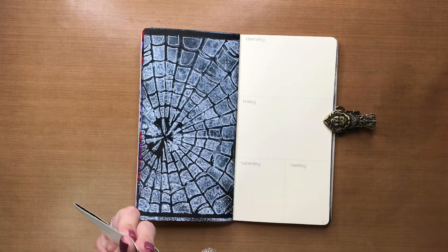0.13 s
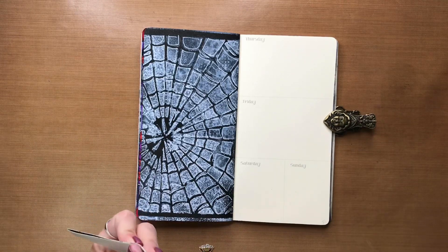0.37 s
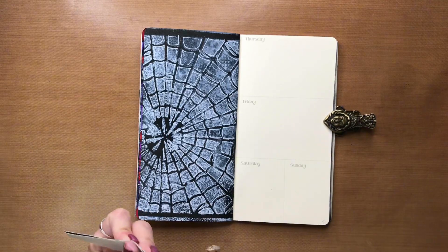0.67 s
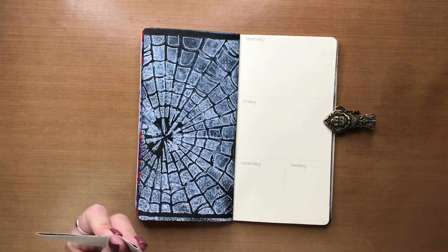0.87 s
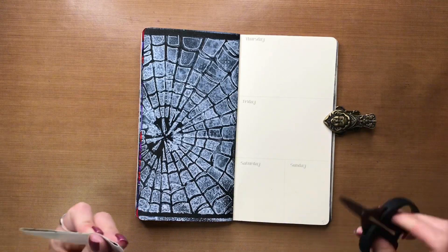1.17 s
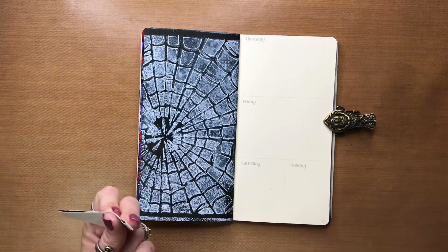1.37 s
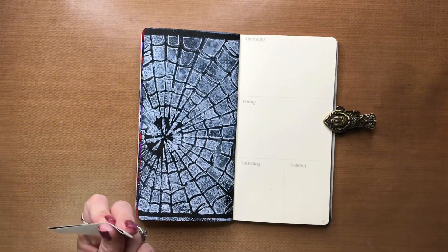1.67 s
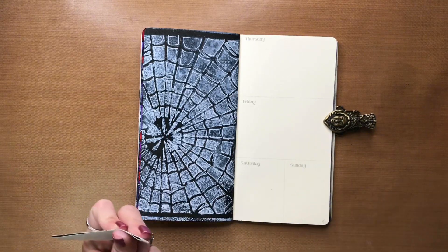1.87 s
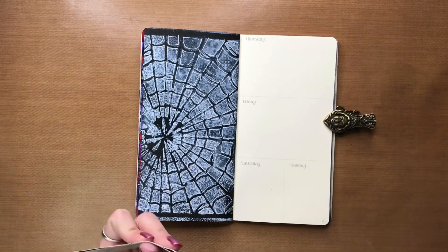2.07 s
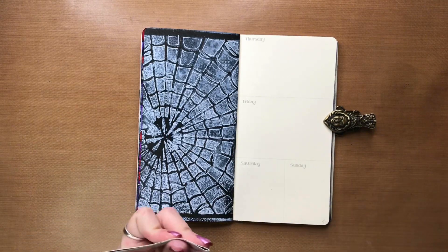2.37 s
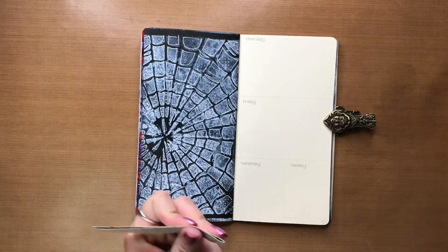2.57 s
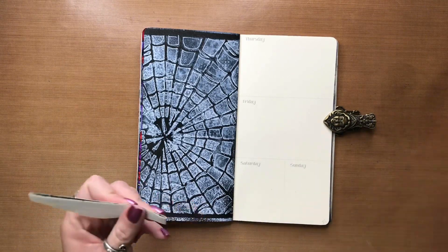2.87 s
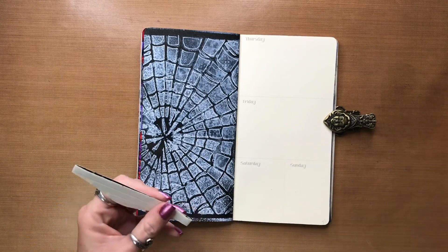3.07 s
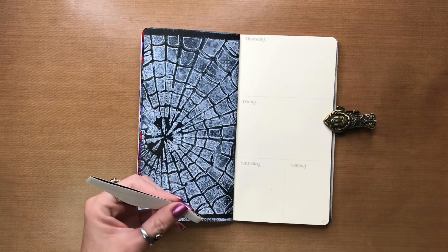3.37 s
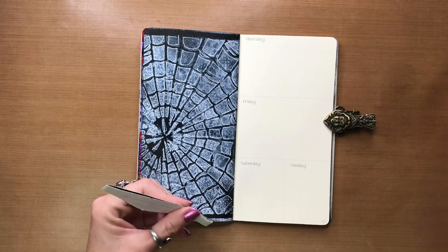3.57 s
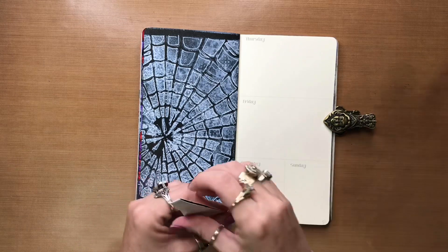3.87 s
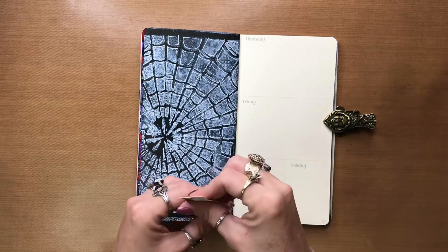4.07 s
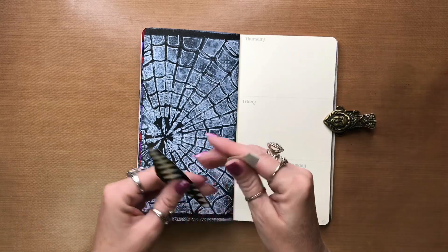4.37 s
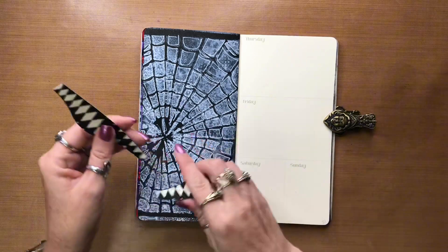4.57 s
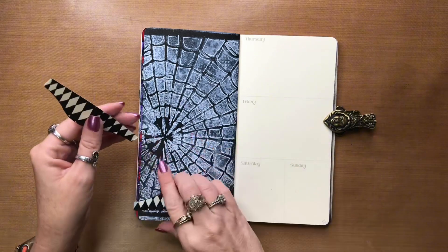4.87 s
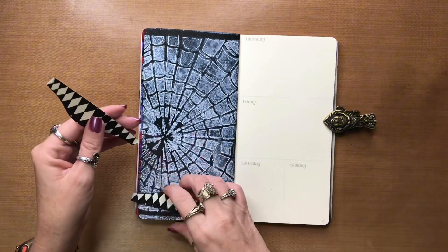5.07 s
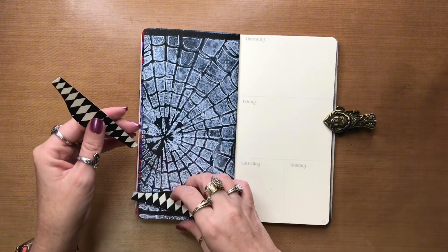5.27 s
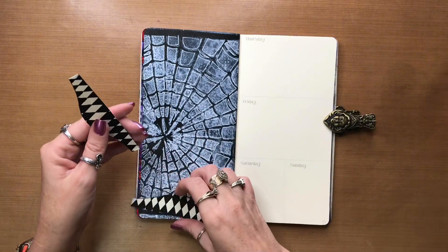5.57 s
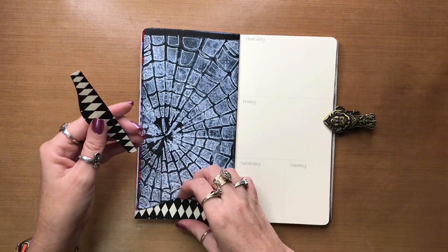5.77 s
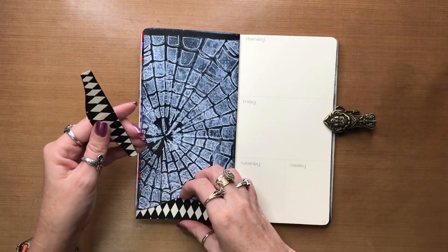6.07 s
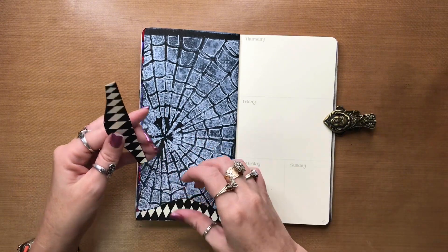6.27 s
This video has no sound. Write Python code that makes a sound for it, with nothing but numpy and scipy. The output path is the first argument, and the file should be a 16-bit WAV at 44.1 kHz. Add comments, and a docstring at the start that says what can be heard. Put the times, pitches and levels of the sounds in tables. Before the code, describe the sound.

Close above a desk in a small, quiet room, mono. Scissors trim card: a short crunch with a snap, then another ending in a loud steely clack. Metal finger rings tick brightly, the scissors are set down with soft knocks and one firmer wooden thump. Dry fingers hiss along card with small flicks, then nails tap and the strip is rubbed on a notebook. Low hum beneath.

```python
"""At a desk in a small room with a low hum, heard from close above in mono: scissors trim a strip of card.
Trains of tiny slips make the crunch, short noise cracks the snaps, a filtered impulse the blades' clack;
finger rings tick on the handles as damped notes, and the scissors are laid down with blows that ring the desk.
Fingers then slide along the strip and rub it flat on an open notebook: friction noise, coloured by skin,
page and cover. A wavering sine hums over soft room noise; two echoes and a short tail make the room."""
import sys
import numpy as np
from scipy import signal
from scipy.fft import rfft, irfft
from scipy.io import wavfile
from scipy.ndimage import uniform_filter1d

SR = 44100
rng = np.random.default_rng(int(sys.argv[2]) if len(sys.argv) > 2 else 0)


def to_wav(sig):
    """Store sig (one row per channel, or 1-D mono) as 16-bit WAV at the path in sys.argv[1].

    Samples outside -1..1 are clipped; the rate is SR.
    """
    pcm = np.clip(np.atleast_2d(sig), -1, 1) * 32767
    pcm = np.round(pcm).astype(np.int16)
    wavfile.write(sys.argv[1], SR, pcm.T)  # frames by channels


N = 282758
TIME = np.arange(N) / SR
AGE = TIME[:12000]  # s since the start of a short sound

# blades shearing card or sliding open: (peak t/s, level/dB, swell/s, fade/s, blade ring/dB, blade note f/Hz)
CUTS = [(0.705, -51, 0.032, 0.012, -15, 6600), (2.024, -62.5, 0.063, 0.05, -10, 4050),
        (2.093, -47.5, 0.019, 0.0091, 6.5, 3800), (2.598, -64.5, 0.04, 0.033, -3, 4070)]
# spectrum of fibres parting between the blades: (f/Hz, level/dB)
SHEAR = [(300, -30), (600, -8), (2000, -14), (3000, 0), (4000, -2), (4900, -5.5), (6300, 2), (8000, -12),
         (14500, -5), (16000, -19)]
# card fibres snapping, card edges flicking, and at 1.07 s a ring ticking without its note as the scissors are
# picked up: (t/s, peak level/dB, brightness/dB, contact time/s, body/dB)
SNAPS = [(0.3137, -56.5, 8, 0.0089, -2.5), (0.3551, -58.5, 6, 0.013, -4.5), (0.405, -60, 6, 0.012, -4),
         (0.705, -38.5, -1.5, 0.0058, -8), (0.7095, -41.5, -4.5, 0.0025, -2.5), (1.07, -65.5, 0, 0.005, -8),
         (2.083, -53.5, -8, 0.0045, -2), (2.088, -48.5, -7, 0.0017, 0), (2.0976, -47.5, -5, 0.0012, -6.5),
         (2.1963, -55.5, -6, 0.0058, -1.5), (2.348, -44.5, -3, 0.017, 2.5), (3.9952, -59.5, 9, 0.014, -5),
         (4.0262, -50, 3, 0.0012, -9), (4.0715, -59.5, 0.5, 0.0012, -14), (4.318, -49, 0, 0.0022, -1),
         (4.3716, -44, -2.5, 0.0017, -1.5), (5.4435, -57.5, -3, 0.005, -8), (5.6012, -54, 6, 0.0055, -5)]
# spectrum of a crack of card: (f/Hz, level/dB)
CARD = [(180, -41), (420, -4), (800, -10), (1400, -3.5), (2800, 2), (4000, 4), (4900, -5.5), (6600, -3),
        (10000, -13.5), (14200, -5), (16000, -16.5)]
# the blades touching, then meeting: (t/s, peak level/dB)
SHUT = [(2.323, -63.5), (2.3453, -13.5)]
# the closed scissors ring broadly near 3.6 kHz: (f/Hz, level/dB)
BLADES = [(200, -45), (1000, -31), (2000, -22), (2600, -11), (3200, -2), (3650, 0), (4300, -9), (4900, -20),
          (6200, -20), (6800, -13), (8000, -27), (11500, -18), (16000, -25)]
# finger rings on the scissors and on each other: (t/s, peak level/dB, note f/Hz, contact time/s)
RINGS = [(1.0851, -51, 4640, 0.0022), (2.5929, -47, 8650, 0.011), (2.622, -50, 9600, 0.0062),
         (2.629, -45.5, 8070, 0.0035), (2.6679, -44, 6700, 0.0043), (2.673, -54, 8200, 0.0059),
         (2.682, -48.5, 7100, .004), (2.7288, -56, 7200, 0.0043), (2.828, -58, 5370, 0.0033),
         (2.845, -60.5, 2323, 0.0043), (2.9284, -46, 4830, 0.002), (4.422, -58, 8900, 0.0042),
         (4.529, -48, 2560, 0.0033)]
# spectrum of a ring's rough tick: (f/Hz, level/dB)
CLINK = [(600, -43), (1500, -25), (2500, -9), (5000, 1.5), (6500, -1), (8750, 10), (10700, -6),
         (16000, 8.5)]
# chime of the rings, before the grip shifts it: (f/Hz, level/dB, t60/s)
CHIME = [(2570, -14.5, 0.025), (4560, -17.5, 0.091), (12300, -12, 0.025), (13500, -3.5, 0.0089),
         (15400, -1.5, .01), (14140, 6, .003)]
# handles and knuckles meeting the desk: (t/s, level/dB before softening, hardness as cut-off f/Hz)
KNOCKS = [(3.1024, -50, 840), (3.179, -51.5, 474), (3.235, -51, 1080), (3.3007, -58, 1700),
          (3.385, -58.5, 990), (3.409, -60, 1000), (3.4434, -35.5, 4220)]
# modes of the desk top: (f/Hz, level/dB, t60/s)
DESK = [(137.5, 2, .19), (168.3, -8.5, .17), (239, -10.5, .1), (321.4, -13, .15), (388, -23, .097),
        (604, -14, .06), (810, -22, .13), (1470, -15, .032)]
# spectrum of the rattle and scuff on the desk: (f/Hz, level/dB)
CLATTER = [(80, -51), (150, -17), (320, -2.5), (430, -7), (570, -4.5), (720, -10), (1100, -9.5),
           (1550, -10.5), (2100, -22.5), (3300, -19.5), (6500, -41), (14000, -44)]
# pressure of the fingers sliding along the card: (t/s, level/dB)
SLIDE = [(3.98, -88), (4.0, -59.5), (4.04, -77), (4.07, -61), (4.14, -70), (4.19, -59), (4.24, -57.5),
         (4.35, -64), (4.44, -78), (4.47, -68.5), (4.54, -63.5), (4.58, -76.5), (4.68, -78)]
# spectrum of dry skin on card: (f/Hz, level/dB)
SKIN = [(290, -27), (500, -9), (800, -12), (1380, -10.5), (2730, -4.5), (4730, -9.5), (5550, 2),
        (16000, -9)]
# resonances of the swish between fingers and card: (f/Hz, level/dB)
SWISH = [(5600, 14), (8700, -15), (14600, 14)]
# light brushes of a fingertip: (peak t/s, level/dB, centre of the swish f/Hz, its rise/Hz per s)
BRUSHES = [(4.72, -70.5, 5700, 12000), (5.26, -71, 9300, 2990)]
# fingernails landing on the notebook: (t/s, tap peak level/dB, share of the cover's notes/dB)
NAILS = [(4.81, -45, -4), (4.951, -49, 2.5)]
# short scrapes on the notebook, the first ones by fingernails: (start t/s, length/s, level/dB, hiss share/dB)
SCRAPES = [(4.813, .031, -47, -11.5), (4.953, 0.024, -55.5, -11), (4.98, 0.033, -65, -5),
           (5.026, 0.064, -67.5, 7), (5.519, 0.0085, -62, 13), (6.14, 0.018, -73, 0)]
# pressure of the fingers rubbing the strip flat, before the grip's flutter: (t/s, level/dB)
RUB = [(5.11, -81.5), (5.26, -73.5), (5.36, -83.5), (5.445, -63.5), (5.47, -69.5), (5.53, -74),
       (5.6, -60.5), (5.65, -63.5), (5.68, -78), (5.71, -71), (5.76, -77), (5.97, -84)]
# spectrum of cover and pages: (f/Hz, level/dB)
BOOK = [(150, -8.5), (500, -11.5), (1050, -11.5), (1290, 3.5), (1520, -4), (1750, -2), (2300, -8.5),
        (2950, -1), (4250, -5), (4750, -35), (5400, -8.5), (8400, -22), (10300, -29), (16000, -38)]
# spectrum of card on paper: (f/Hz, level/dB)
PAGE = [(400, -2), (2000, -0.5), (3400, 2), (4300, 2), (5800, -11), (8800, -1.5), (10200, -15),
        (12000, -11), (16000, -11)]
# modes of the notebook cover: (f/Hz, level/dB, t60/s)
COVER = [(1300, 4, 0.032), (1750, -1, 0.03), (2950, 1.5, 0.018), (4250, -1, 0.016)]
# spectrum of the room noise: (f/Hz, level/dB)
AIR = [(47, -36), (80, -3.5), (114, -4), (178, -10), (296, -11.5), (615, -20.5), (1140, -22.5), (1950, -26),
       (5400, -30.5), (10500, -34), (12800, -29), (16000, -32.5)]
# echoes off the desk and the nearest wall: (delay t/s, level/dB)
ECHOES = [(.0027, -18.5), (.0097, -24)]
# the room's tail: (f/Hz, t60/s, level/dB)
ROOM = [(150, 0.31, 0.5), (1000, 0.13, 3.5), (2710, 0.12, -3), (3900, .12, 0), (7000, .13, -2.5),
        (16470, 0.13, -2)]

BLADE_T60 = 0.004  # s
MIDDLE_DB, TOP_DB = -6, -9  # 2.5-5 kHz and above 9 kHz in a snap; brightness trades one for the other
NOTE_CYCLES = 45  # a ring's note falls 60 dB in this many cycles
DETUNE = 0.018  # scale of the chime's random pitch shift with the grip
CRISP_S, DULL_DB_PER_S = 0.0017, 2293  # touches this short are nearly all chime; longer ones lose it
BOOM_DB = 4.5  # desk top under a hard blow
SOFT_BOOM_DB, HARD_HZ = -2.5, 3007  # blows softer than this cut-off move the desk top less
SWISH_T60, BRUSH_T60, NAIL_T60 = 0.0018, 0.003, 0.01  # s
BRUSH_SWELL_S, BRUSH_FADE_S = 0.071, 0.056
SCRAPE_ATTACK_S, SCRAPE_RELEASE_S = 0.0099, 0.0047
COVER_WANDER = 0.015  # rms share by which the cover's notes shift
HUM_HZ, HUM_DB, AIR_DB = 59.6, -59.5, -70
EDGE_HZ = 16150  # upper limit of the recorder


def shut(lag=0.00043, ring_hz=3700, rattle_db=-38, rattle_t60=0.216):
    """Steel meets steel: one hard clack, damped at once by the hand, and a faint rattle of the pivot."""
    out = np.zeros(N)
    spectrum = rfft(colour(signal.unit_impulse(len(AGE)), BLADES))
    hz = np.fft.rfftfreq(len(AGE), 1 / SR)
    # bending waves run faster the higher they are, so the treble leaves the blades first
    dispersion = np.exp(-4j * np.pi * lag * np.sqrt(ring_hz * hz))
    clack = irfft(spectrum * dispersion, len(AGE)) * (AGE < 0.1)
    rattle = band(burst(rattle_t60), [3200, 4400], "band")
    for s, db in SHUT:
        add(out, s, amp(db) * (peaked(clack) + amp(rattle_db) * peaked(rattle)))
    return out


def cuts():
    """Fibres part between the blades, which sing along faintly."""
    crunch = slips(per_s=7000, spread_db=2.3) * flutter(hz=150, depth_db=2.8)
    fibres = evened(colour(crunch, SHEAR))
    out = np.zeros(N)
    for s, db, swell, fade, ring_db, hz in CUTS:
        blades = evened(sing(crunch, hz, BLADE_T60))
        out += stroke(s, db, swell, fade, shape=1.2) * blend(fibres, blades, ring_db)
    return out


def snaps():
    """Short dry cracks of card; the brighter the crack, the more top and the less middle."""
    out = np.zeros(N)
    for s, db, bright_db, seconds, body_db in SNAPS:
        crack = colour(graze(seconds), CARD)
        middle = band(crack, [2500, 5000], "band")
        top = band(crack, 9000, "high", order=4)
        body = band(band(crack, 9000, "low", order=4), [2500, 5000], "bandstop")
        snap = amp(body_db) * peaked(body)
        snap = snap + amp(MIDDLE_DB - bright_db) * peaked(middle)
        snap = snap + amp(TOP_DB + bright_db) * peaked(top)
        add(out, s, amp(db) * peaked(snap))
    return out


def rings(note_db=-5):
    """Each metal touch is a rough tick, a damped note and the rings' high chime; brief ones chime most."""
    out = np.zeros(N)
    for s, db, hz, seconds in RINGS:
        touch = graze(seconds)
        note = peaked(sing(touch, hz, NOTE_CYCLES / hz))  # low notes last longer
        tick = peaked(colour(touch, CLINK)) + amp(note_db) * note
        chime = np.zeros(len(AGE))
        for f, mode_db, t60 in CHIME:
            gripped_hz = f * (1 + DETUNE * rng.uniform(-0.54, 1))
            chime += amp(mode_db) * peaked(sing(touch, gripped_hz, t60))
        share = np.clip(amp(-DULL_DB_PER_S * (seconds - CRISP_S)), 0, 0.95)
        mixed = np.sqrt(1 - share ** 2) * peaked(tick) + share * peaked(chime)
        add(out, s, amp(db) * peaked(mixed))
    return out


def desk(clatter_t60=0.099, tick_db=-5, tick_t60=0.012):
    """Blows ring the desk top and rattle what lies on it; soft ones lose the treble."""
    out = np.zeros(N)
    modes = sum(amp(mode_db) * mode(hz, t60, cycles=1.0) for hz, mode_db, t60 in DESK)
    boom = peaked(band(modes, 98, "high"))
    for s, db, hard_hz in KNOCKS:
        boom_db = BOOM_DB + SOFT_BOOM_DB * max(1 - hard_hz / HARD_HZ, 0)
        clatter = peaked(colour(burst(clatter_t60), CLATTER))
        tick = amp(tick_db) * peaked(burst(tick_t60))
        blow = amp(boom_db) * boom + clatter + tick
        add(out, s, amp(db) * band(blow, hard_hz, "low"))
    return out


def drag(s=3.38, db=-68, swell=0.21, fade=0.1):
    """The handles scuff over the desk before they settle: slips with the treble taken off."""
    scuff = colour(slips(per_s=2700, spread_db=2), CLATTER)
    return evened(band(scuff, 1400, "low")) * stroke(s, db, swell, fade)


def slides(swish_db=-8, brush_db=3, grip_db=1.7):
    """Dry skin hisses along the card; a light brush is mostly a narrow swish that rises as the finger moves."""
    grit = slips(per_s=11000, spread_db=1.9)
    grit = grit * flutter(hz=55, depth_db=grip_db)
    hiss = evened(colour(grit, SKIN))
    swish = evened(sum(amp(db) * evened(sing(grit, hz, SWISH_T60)) for hz, db in SWISH))
    out = pressure(SLIDE) * blend(hiss, swish, swish_db)
    for s, db, hz, rise in BRUSHES:
        rising_hz = np.clip(hz + rise * (TIME - s), hz / 2, hz * 2)
        whisk = evened(glide(grit, rising_hz, BRUSH_T60))
        touch = stroke(s, db, BRUSH_SWELL_S, BRUSH_FADE_S, shape=1.44)
        out += touch * blend(hiss, whisk, brush_db)
    return out


def notebook(cover_db=-2, rub_hiss_db=6, grip_db=2.5):
    """Nails tap and scrape, sounding through the cover; rubbing is mostly hiss on the page."""
    grit = slips(per_s=6000, spread_db=2.2)
    # the cover's notes shift under the hand
    bend = 1 + COVER_WANDER * evened(band(rng.standard_normal(N), 23, "low"))
    cover = evened(sum(amp(db) * evened(glide(grit, hz * bend, t60)) for hz, db, t60 in COVER))
    scrape = blend(evened(colour(grit, BOOK)), cover, cover_db)
    hiss = evened(colour(grit, PAGE))
    grip = flutter(hz=80, depth_db=grip_db)
    out = pressure(RUB) * grip * blend(scrape, hiss, rub_hiss_db)
    out += stroke(4.56, db=-77.0, swell=0.51, fade=0.64) * scrape  # the hand shifts on the cover
    for s, seconds, db, hiss_db in SCRAPES:
        attack = np.clip((TIME - s) / SCRAPE_ATTACK_S, 0, 1)
        release = np.exp(-np.maximum(TIME - s - seconds, 0) / SCRAPE_RELEASE_S)
        out += amp(db) * attack * release * blend(scrape, hiss, hiss_db)
    notes = peaked(sum(amp(db) * mode(hz, t60, cycles=1) for hz, db, t60 in COVER))
    for s, db, note_db in NAILS:
        tap = peaked(colour(burst(NAIL_T60), BOOK))
        add(out, s, amp(db) * (tap + amp(note_db) * notes))
    return out


def background(waver=0.084, rumble_db=-73):
    """A slightly wavering sine hum over a low rumble and soft room noise."""
    drift = evened(band(rng.standard_normal(N), 6, "low"))
    hum = np.sqrt(2) * np.sin(2 * np.pi * HUM_HZ * TIME) * (1 + waver * drift)
    rumble = evened(band(rng.standard_normal(N), [35, 110], "band"))
    air = evened(colour(rng.standard_normal(N), AIR))
    return amp(HUM_DB) * hum + amp(rumble_db) * rumble + amp(AIR_DB) * air


def room(x, wet_db, build=0.001):
    """The direct sound, two near echoes and a short diffuse tail of noise that dies at its own rate per band."""
    hz, t, z = signal.stft(rng.standard_normal(len(AGE)), SR, nperseg=256)
    t60 = read([(f, seconds) for f, seconds, _ in ROOM], hz)[:, None]
    db = read([(f, level) for f, _, level in ROOM], hz)[:, None]
    tail = signal.istft(z * amp(db - 60 * t / t60), SR, nperseg=256)[1][:len(AGE)]
    tail = tail * (1 - np.exp(-AGE / build))
    response = amp(wet_db) * tail / np.linalg.norm(tail)
    for s, echo_db in ECHOES:
        add(response, s, amp([echo_db]))
    return x + signal.fftconvolve(x, response)[:N]


def slips(per_s, spread_db):
    """Friction: a dense train of tiny slips of uneven size."""
    size = amp(spread_db * np.minimum(rng.exponential(1, N), 4))
    return size * rng.standard_normal(N) * (rng.random(N) < per_s / SR)


def graze(seconds):
    """A brief rough contact that swells quickly and dies away."""
    u = 4 * AGE / max(seconds, 0.0005)
    return rng.standard_normal(len(AGE)) * u * np.exp(-u)


def burst(t60):
    """A dying puff of noise."""
    return rng.standard_normal(len(AGE)) * amp(-60 * AGE / t60)


def mode(hz, t60, cycles):
    """A dying sine that builds up over some cycles."""
    build = 1 - np.exp(-AGE * hz / cycles)
    return np.sin(2 * np.pi * hz * AGE) * amp(-60 * AGE / t60) * build


def sing(x, hz, t60):
    """Drives one damped resonance."""
    return signal.fftconvolve(x, mode(hz, t60, cycles=1.0))[:len(x)]


def glide(x, hz, t60):
    """Drives a resonance whose pitch follows hz: shifted down to zero, smoothed by one pole, shifted back."""
    turn = np.exp(2j * np.pi * np.cumsum(hz) / SR)
    r = amp(-60 / (t60 * SR))
    return (turn * signal.lfilter([1 - r], [1, -r], x / turn)).real


def stroke(s, db, swell, fade, shape=2):
    """Pressure of one stroke: 20 dB down at one swell before and one fade after its peak."""
    away = np.maximum((s - TIME) / swell, (TIME - s) / fade)
    return amp(db - 20 * np.minimum(away, 10) ** shape)


def pressure(curve):
    """Gain that follows a level curve and is silent outside it."""
    s, db = np.transpose(curve)
    return amp(np.interp(TIME, s, db, left=-np.inf, right=-np.inf))


def flutter(hz, depth_db):
    """Uneven grip: a gain that wanders at random."""
    return amp(depth_db * evened(band(rng.standard_normal(N), hz, "low")))


def blend(main, extra, share_db):
    """Adds a share of a second sound, keeping the total power if both are unrelated and equally strong."""
    return (main + amp(share_db) * extra) / np.hypot(1, amp(share_db))


def colour(x, points):
    """Causal minimum-phase filter with the given spectrum."""
    hz = abs(np.fft.fftfreq(4096, 1 / SR))
    log_gain = np.log(amp(np.maximum(read(points, hz), -100)))
    taps = np.fft.ifft(np.exp(np.conj(signal.hilbert(log_gain)))).real
    return signal.fftconvolve(x, taps[:len(hz) // 2])[:len(x)]


def band(x, hz, kind, order=2):
    """Butterworth filter."""
    return signal.sosfilt(signal.butter(order, hz, kind, fs=SR, output="sos"), x)


def read(points, hz):
    """Reads a table on a log-frequency axis."""
    f, value = np.transpose(points)
    return np.interp(np.log(hz + 1), np.log(f + 1), value)


def amp(db):
    """Decibels to gain."""
    return 10 ** (np.asarray(db) / 20)


def evened(x):
    """Scales to rms 1."""
    return x / np.sqrt(np.mean(x ** 2) + 1e-20)


def peaked(x):
    """Scales the loudest two milliseconds to rms 1."""
    return x / np.sqrt(uniform_filter1d(x ** 2, size=88, mode="constant").max())


def add(mix, s, sound):
    """Mixes a sound in at time s."""
    part = mix[round(s * SR):][:len(sound)]
    part += sound[:len(part)]


def scene():
    """Scissors and hands, each with its share of room, over the background; one channel."""
    scissors = room(shut(), wet_db=-11.5)
    scissors = scissors + room(cuts() + snaps(), wet_db=-10.5)
    scissors = scissors + room(rings(), wet_db=-6.0)
    hands = room(desk() + drag(), wet_db=-13.5)
    hands = hands + room(slides() + notebook(), wet_db=-10.5)
    return (scissors + hands + background())[None]


def record(dry):
    """The recorder's band limit: a steep low-pass."""
    low_pass = signal.firwin(255, EDGE_HZ, window=("kaiser", 8), fs=SR)
    return signal.oaconvolve(dry, low_pass[None], "same")


dry = scene()
out = record(dry)
to_wav(out)
```